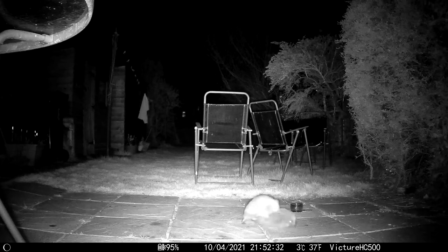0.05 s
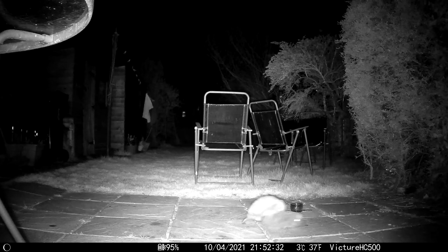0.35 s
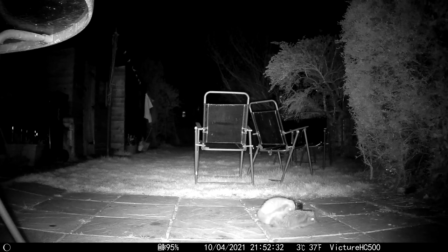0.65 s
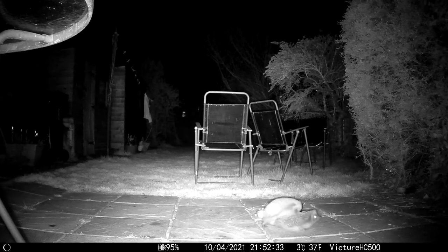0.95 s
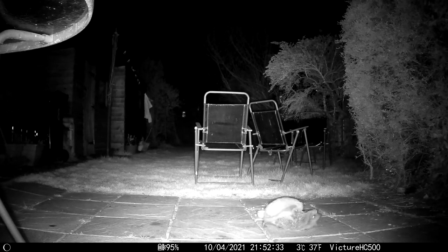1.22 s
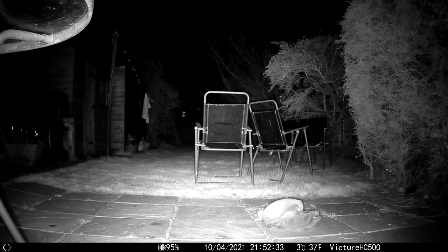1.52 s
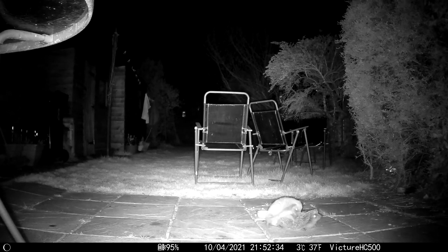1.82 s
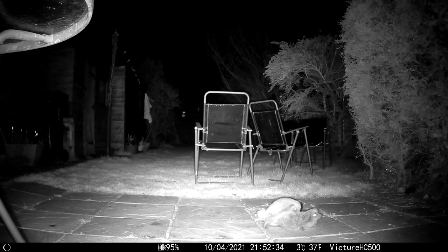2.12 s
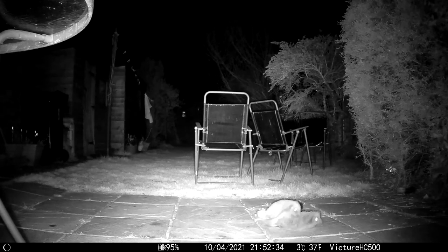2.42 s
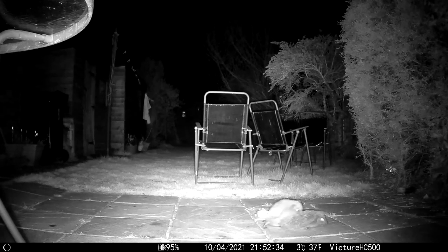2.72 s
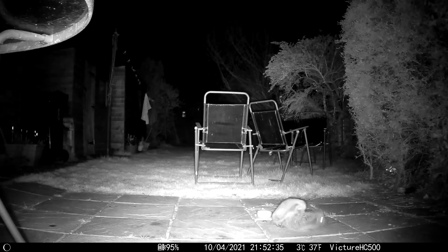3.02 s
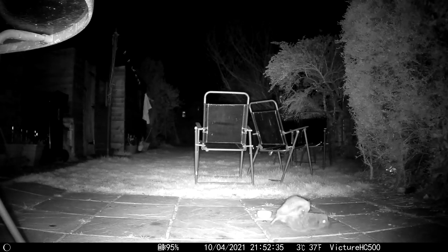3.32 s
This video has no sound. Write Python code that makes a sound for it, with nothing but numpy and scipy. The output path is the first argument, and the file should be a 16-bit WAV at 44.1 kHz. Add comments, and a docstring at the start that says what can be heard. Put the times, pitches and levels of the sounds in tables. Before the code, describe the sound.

Hedgehogs shuffle faintly on garden paving, with soft scrapes, crisp brushes of spines, small claw ticks and nudged grit. They rustle until about 1.1 seconds, pause, then continue from 1.5 to 3.3 seconds. A light breeze rumbles and thumps on the microphone, strongest around 0.6 to 0.9 and 1.5 to 2.2 seconds. Steady camera hiss, a thin whine and a faint high warble run throughout.

```python
"""Soft rustles and ticks: hedgehogs shuffling over paving slabs in a garden at night.
Feet scrape and spines brush in many tiny slips; claws tick on the stone, nudged grit grates.
A light breeze buffets the microphone of a small outdoor camera with rumble and thumps.
The camera adds its own hiss, a thin whine and a faint high warble."""
import sys
import numpy as np
from scipy import signal
from scipy.fft import rfft, irfft, next_fast_len
from scipy.io import wavfile
from scipy.ndimage import uniform_filter1d

SR = 44100
rng = np.random.default_rng(int(sys.argv[2]) if len(sys.argv) > 2 else 0)


def log_audio(samples):
    """Write samples as a 16-bit WAV file to the path given in sys.argv[1]."""
    # one column per channel
    frames = np.atleast_2d(samples).T
    # limit to full scale, then quantise
    limited = np.clip(frames, -1, 1)
    pcm = np.round(limited * 32767).astype(np.int16)
    wavfile.write(sys.argv[1], SR, pcm)


N = 156555
T = np.arange(N) / SR

# shuffles: centre t/s, sigma/s, scrape level/dB, spine level/dB
SHUFFLES = [(0.136, 0.035, -73, -72), (0.189, 0.018, -65, -64), (0.262, 0.033, -66, -69),
            (0.391, 0.009, -78, -57.5), (0.429, 0.048, -65, -64.5), (0.514, 0.028, -66.5, -64.5),
            (0.61, 0.036, -66, -64.5), (0.713, 0.036, -64.5, -65), (0.769, 0.006, -71, -54),
            (0.79, 0.025, -65, -65.5), (0.866, 0.044, -70, -78), (0.952, 0.06, -67, -69.5),
            (1.053, 0.027, -68, -65.5), (1.553, 0.049, -68.5, -70.5), (1.68, 0.064, -69, -79),
            (1.917, 0.1, -69.5, -68.5), (2.08, 0.058, -67, -71), (2.145, 0.014, -66, -70),
            (2.247, 0.091, -70.5, -71), (2.446, 0.017, -67, -66), (2.499, 0.015, -61.5, -60.5),
            (2.547, 0.02, -66.5, -73), (2.608, 0.019, -70, -67.5), (2.727, 0.035, -66, -67),
            (2.864, 0.037, -67.5, -66), (2.948, 0.014, -71.5, -66), (3.05, 0.088, -78, -75),
            (3.132, 0.041, -69, -64), (3.299, 0.027, -66, -63.5)]
# dull scrape, crisp spines: f/Hz, relative level/dB
SCRAPE_SPECTRUM = [(100, -10.5), (300, 2.5), (900, 3), (1400, -2), (2600, -3), (4000, -3), (6000, -5.5),
                   (9000, -3.5), (15000, -52)]
SPINE_SPECTRUM = [(500, -20), (3000, -23), (5500, -10.5), (7500, -4.5), (9300, -2), (11000, -2.5),
                  (12500, -5.5), (15500, -26.5)]
# claws and spine tips on stone: t/s, knock level/dB, snap level/dB, snap f/Hz, snap width/Hz
CONTACTS = [(.1808, -64, -54, 8800, 2000), (.1895, -68, -52, 9200, 4600), (.1928, -53.5, -48.5, 9000, 2700),
            (.2628, -48, -47, 10500, 3000), (.386, -66, -49.5, 9700, 3200), (.397, -63, -54, 9900, 3200),
            (.739, -53.5, -51, 7000, 2800), (.8885, -58.5, -52.5, 9600, 2000),
            (1.6985, -64, -51, 9800, 7500), (2.0605, -66, -52.5, 8800, 2200), (2.079, -68, -54, 9400, 2530),
            (2.132, -53, -53.5, 8200, 5500), (2.4258, -51.5, -50.5, 2450, 2900),
            (2.4333, -56, -53, 7000, 3260), (2.4425, -59, -49.5, 7550, 3800),
            (2.7835, -66, -53.5, 11100, 3500), (3.0403, -74, -53, 10000, 2500),
            (3.2885, -57, -56, 9500, 5000)]
# knock on stone: f/Hz, relative level/dB
KNOCK_SPECTRUM = [(200, -25), (800, -4), (1500, 2.5), (2700, -3), (3900, 1), (6000, 2), (9000, -29),
                  (15000, -13)]
# nudged grit: centre t/s, sigma/s, f/Hz, level/dB
GRIT_TAPS = [(0.195, 0.0046, 3920, -67), (0.445, 0.021, 950, -69), (.857, .006, 7350, -68),
             (0.858, 0.004, 3680, -68), (1.578, 0.025, 3850, -70.5), (1.705, .004, 4110, -67),
             (2.308, 0.0026, 1676, -61.5), (2.528, 0.025, 855, -69), (2.597, 0.0049, 3920, -66.5),
             (2.876, 0.0029, 792, -63.5)]
# breeze at the microphone: t/s, level/dB
BREEZE_LEVEL = [(0, -61.5), (.18, -60.5), (.38, -53), (.48, -59.5), (.62, -48), (.76, -50), (.9, -48),
                (1.02, -57.5), (1.42, -60.5), (1.54, -49.5), (1.77, -49.5), (1.87, -45), (2.02, -50),
                (2.17, -50), (2.34, -57.5), (2.52, -55.5), (2.6, -58), (2.9, -57.5), (3.17, -70),
                (3.32, -58.5), (3.55, -70.5)]
# wind bands: f/Hz, relative level/dB
RUMBLE_SPECTRUM = [(10, -13), (22, -1.5), (45, -2), (75, -8), (110, -12), (160, -21), (250, -30),
                   (500, -45.5), (2000, -79.5)]
FLUTTER_SPECTRUM = [(20, -34.5), (55, 3), (90, 4), (125, -4), (170, -13), (240, -21.5), (400, -28),
                    (1000, -52.5), (3000, -75)]
# eddies at the microphone: t/s, f/Hz, peak level/dB
EDDY_HITS = [(0.223, 85, -46), (0.235, 43.5, -42), (0.278, 88, -46), (0.622, 96, -43), (0.647, 126, -44),
             (0.677, 98, -41), (0.706, 82, -34), (0.868, 130, -44), (0.887, 60.5, -51), (1.285, 79.4, -45),
             (1.556, 68, -33.5), (1.576, 117, -39.5), (1.664, 98, -41), (1.712, 60, -40.5),
             (1.751, 69.7, -40), (1.838, 71, -37.5), (1.905, 79.5, -42), (1.92, 96, -37),
             (1.942, 119.5, -38), (2.078, 89, -36.5), (2.126, 53.5, -36.5), (2.203, 80, -46),
             (2.487, 86, -43.5), (2.54, 66.4, -45), (2.681, 27, -39), (2.724, 106, -43.5),
             (2.847, 71.4, -38), (3.053, 48.6, -47)]
# camera hiss: f/Hz, relative level/dB
HISS_SPECTRUM = [(20, 21), (100, 0.5), (200, 11), (330, 6), (520, 2), (900, -0.5), (1300, -3), (2500, -4.5),
                 (4000, -4.5), (6000, -3.5), (9300, -3.5), (12000, -5), (14300, -4), (15500, -6)]
# camera whine: f/Hz, level/dB
WHINE_TONES = [(4689, -81), (6250, -82), (7811, -90), (9378, -80), (10939, -84), (12500, -90), (14061, -91),
               (15628, -97)]
# camera warble: t/s, top f/Hz, level/dB
WARBLE_TRACK = [(.2, 11400, -72), (.55, 12200, -72), (1, 14200, -75), (1.55, 14300, -75),
                (1.9, 13570, -68.5), (3.4, 14270, -73.5)]


def rustles():
    """Each shuffle swells and fades: a dull scrape on the slab, a crisp brush of spines."""
    scrape_power, spine_power = np.zeros((2, N))
    for centre_s, sigma_s, scrape_db, spine_db in SHUFFLES:
        envelope = swell(centre_s, sigma_s)
        scrape_power += (amp(scrape_db) * envelope) ** 2
        spine_power += (amp(spine_db) * envelope) ** 2
    scrape = colour(friction() * np.sqrt(scrape_power), SCRAPE_SPECTRUM)
    spines = colour(friction() * np.sqrt(spine_power), SPINE_SPECTRUM)
    return scrape + spines


def friction(slips_per_s=3100, spread_db=7, slip_share=0.55):
    """Many tiny slips of uneven size in a soft rush."""
    slips = (rng.random(N) < slips_per_s / SR) * rng.choice([-1, 1], N)
    sizes = amp(spread_db * np.minimum(rng.exponential(1, N), 4))
    rush = rng.standard_normal(N)
    return np.sqrt(slip_share) * unit(slips * sizes) + np.sqrt(1 - slip_share) * rush


def claw_ticks(crack_db=11, decay_s=0.00058, tail_s=0.017, tail_db=-14.5):
    """A crack and a gritty tail drive a broad knock and a snap at each contact's own pitch."""
    t = np.arange(2000) / SR
    fade = np.exp(-t / decay_s) + amp(tail_db) * np.exp(-t / tail_s)
    knocks, snaps = np.zeros((2, N))
    for start_s, knock_db, snap_db, hz, width_hz in CONTACTS:
        start = round(start_s * SR)
        span = slice(start, start + len(t))
        drive = fade * rng.choice([-1, 1], (2, len(t)))
        drive[:, 0] = amp(crack_db)
        knocks[span] += amp(knock_db) * drive[0]
        edges_hz = np.clip([hz - width_hz / 2, hz + width_hz / 2], 100, 20000)
        band = signal.butter(2, edges_hz, "bandpass", fs=SR)
        makeup_gain = np.sqrt(SR / 2 / width_hz)
        snaps[span] += amp(snap_db) * makeup_gain * signal.lfilter(*band, drive[1])
    return colour(knocks, KNOCK_SPECTRUM) + snaps


def grit_taps(grate_rate_hz=500):
    """Each nudged bit sounds around one pitch, which jumps about as it grates."""
    out = np.zeros(N)
    for centre_s, sigma_s, hz, db in GRIT_TAPS:
        spread_hz = 180 * np.sqrt(hz / 2000)
        pitch_hz = hz + spread_hz * drift(grate_rate_hz)
        out += amp(db) * np.sqrt(2) * swell(centre_s, sigma_s) * sine(pitch_hz)
    return out


def wind(gust_db=-50, flutter_growth=2.05):
    """A deep rumble follows the breeze; a higher flutter grows faster in gusts."""
    breeze_db = np.interp(T, *np.transpose(BREEZE_LEVEL))
    rumble_db = breeze_db + 0.5
    flutter_db = gust_db + flutter_growth * (breeze_db - gust_db) - 4
    rumble = amp(rumble_db) * turbulence(RUMBLE_SPECTRUM)
    flutter = amp(flutter_db) * turbulence(FLUTTER_SPECTRUM)
    return rumble + flutter


def turbulence(spectrum, window_s=0.04, steadiness=0.73):
    """Low noise with its chance lulls partly evened out."""
    rush = noise(spectrum)
    power = uniform_filter1d(rush ** 2, int(window_s * SR)) + 1e-6
    return unit(rush / power ** (steadiness / 2))


def eddies(smoothness=3.77):
    """Each eddy hits the microphone as one soft push and pull of pressure."""
    out = np.zeros(N)
    for centre_s, hz, db in EDDY_HITS:
        near = abs(T - centre_s) < 0.15
        pulse = (1 - 2j * np.pi * hz * (T[near] - centre_s) / smoothness) ** -(smoothness + 1)
        rotation = np.exp(2j * np.pi * rng.random())
        out[near] += amp(db) * (pulse * rotation).real
    return out


def electronics(hiss_db=-62.5):
    """The camera's even hiss and comb of thin steady tones."""
    whine = np.zeros(N)
    for hz, db in WHINE_TONES:
        whine += amp(db) * np.sqrt(2) * np.sin(2 * np.pi * (hz * T + rng.random()))
    return amp(hiss_db) * noise(HISS_SPECTRUM) + whine


def warble(rate_hz=15, start_s=0.033, chirp_s=0.041, dip_hz=2700, fuzz_hz=750, flicker_db=2):
    """A faint, fuzzy chirp arches up and down once for each picture the camera takes."""
    times_s, top_hz, db = np.transpose(WARBLE_TRACK)
    progress = (T - start_s) % (1 / rate_hz) / chirp_s
    arch = np.sin(np.pi * np.minimum(progress, 1))
    pitch_hz = np.interp(T, times_s, top_hz) - dip_hz * (1 - arch) ** 2
    level_db = np.interp(T, times_s, db) + flicker_db * drift(2 * rate_hz)
    fuzzy_tone = unit(drift(fuzz_hz) * sine(pitch_hz))
    return amp(level_db) * (progress < 1) * fuzzy_tone


def amp(db):
    """Decibels to gain."""
    return 10 ** (np.asarray(db) / 20)


def unit(x):
    """Scale to unit rms."""
    return x / np.sqrt(np.mean(x ** 2) + 1e-20)


def sine(hz):
    """Sine following a pitch curve."""
    return np.sin(2 * np.pi * np.cumsum(hz) / SR)


def swell(centre_s, sigma_s):
    """Gaussian rise and fall."""
    return np.exp(-np.minimum(((T - centre_s) / sigma_s) ** 2 / 2, 50))


def colour(x, spectrum):
    """Minimum-phase filter; white noise keeps its power."""
    hz, db = np.transpose(spectrum)
    size = next_fast_len(N)
    bins_hz = abs(np.fft.fftfreq(size, 1 / SR))
    gain = unit(amp(np.interp(np.log(bins_hz + 1), np.log(hz), db)))
    response = np.exp(np.conj(signal.hilbert(np.log(gain))))
    return irfft(rfft(x, size) * response[:size // 2 + 1], size)[:N]


def noise(spectrum):
    """Steady coloured noise, unit rms."""
    return unit(colour(rng.standard_normal(N), spectrum))


def drift(rate_hz):
    """Smooth random wander up to about rate_hz, unit rms."""
    size = next_fast_len(N)
    lowpass = np.exp(-(np.fft.rfftfreq(size, 1 / SR) / rate_hz) ** 2)
    return unit(irfft(rfft(rng.standard_normal(size)) * lowpass, size)[:N])


def scene():
    """Hedgehogs, breeze and camera noise, mono."""
    hedgehogs = rustles() + claw_ticks() + grit_taps()
    breeze = wind() + eddies()
    camera = electronics() + warble()
    return (hedgehogs + breeze + camera)[None]


def record(dry):
    """The camera's band limit."""
    cutoff_hz = 15720
    lowpass = signal.firwin(801, cutoff_hz, window=("kaiser", 9), fs=SR)
    return signal.oaconvolve(dry, lowpass[None], "same")


dry = scene()
out = record(dry)
log_audio(out)
```